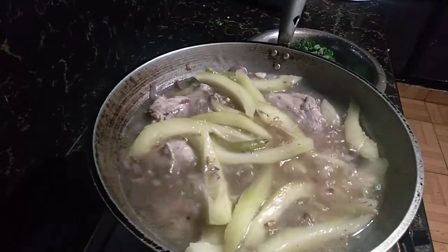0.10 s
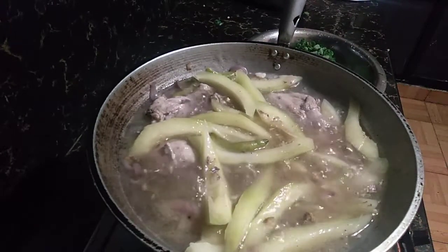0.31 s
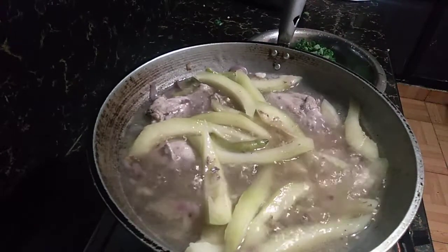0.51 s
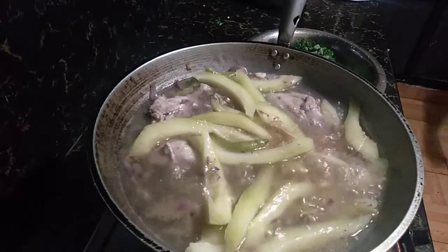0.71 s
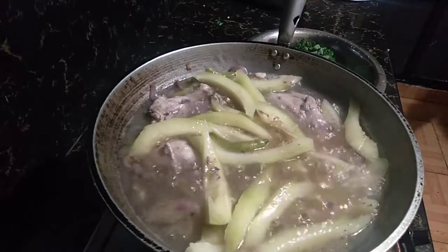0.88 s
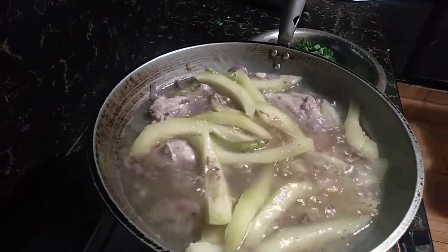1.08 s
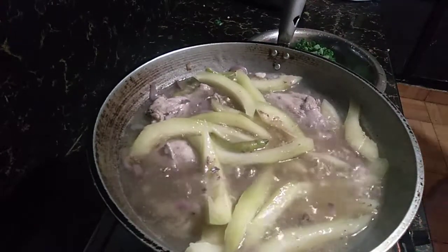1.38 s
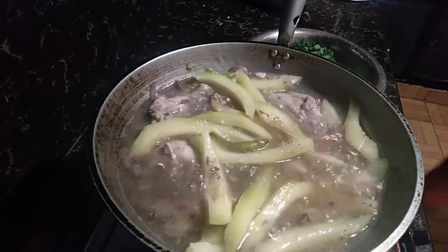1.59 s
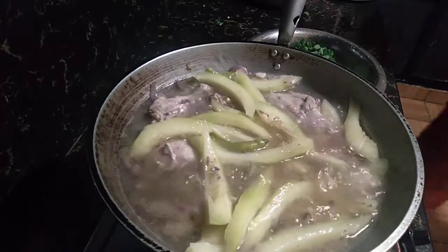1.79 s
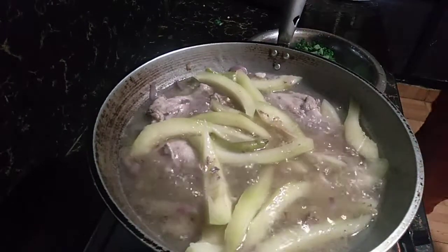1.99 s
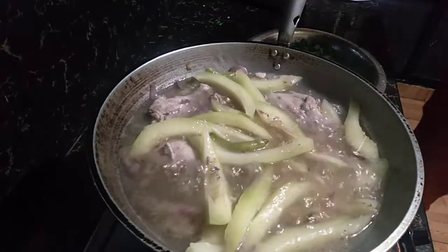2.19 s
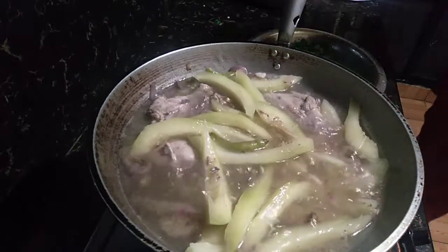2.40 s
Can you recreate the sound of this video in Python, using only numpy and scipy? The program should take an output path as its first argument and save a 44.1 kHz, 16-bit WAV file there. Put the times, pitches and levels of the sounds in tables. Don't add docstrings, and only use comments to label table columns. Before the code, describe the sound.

Broth simmers in a wide metal pan, hiss swelling and fading in uneven waves, with gurgles, bubble pops, fat spits and dry ticks over a very faint flame rumble; close stereo microphone in a small kitchen.

```python
import sys
import numpy as np
from scipy import signal
from scipy.fft import rfft, irfft, next_fast_len
from scipy.io import wavfile
from scipy.ndimage import uniform_filter1d, map_coordinates

SR = 44100
rng = np.random.default_rng(int(sys.argv[2]) if len(sys.argv) > 2 else 0)


def rack_gain(trim_db):
    fader = np.asarray(trim_db, float)
    return 10 ** (fader / 20)


def unload_wav(signal):
    wavfile.write(
        sys.argv[1],
        SR,
        np.round(np.clip(np.atleast_2d(signal).T, -1, 1) * 32767).astype(np.int16),
    )


N = 112455

# start in seconds, peak level in dB, rise in seconds,
# 60 dB decay in seconds, level of the wet body against the hiss in dB.
SLOPS = [(-.05, -44, 0.036, 0.37, -1), (0.083, -52, 0.0052, 5.8, -6.5), (0.199, -36.5, 0.033, 1.26, -14),
         (0.224, -34, 0.042, 0.73, -11.5), (0.298, -42.5, 0.081, 0.93, -5.5), (0.546, -49, 0.069, 7.8, -83),
         (0.696, -38, 0.054, 0.66, -9), (.78, -45, 0.12, 0.78, -5.5), (1.1, -56.5, 0.012, 0.46, -7.5),
         (1.181, -32.5, 0.019, 0.28, -12), (1.213, -38, 0.044, 0.92, -8.5), (1.37, -49, 0.076, 0.69, -16),
         (1.455, -44.5, 0.043, 0.47, -6.5), (1.638, -49.5, 0.0076, 0.14, -42),
         (1.723, -43, 0.044, 1.94, -22.5), (1.799, -52, 0.032, 0.49, -9.5), (1.957, -43, 0.032, 1.5, -10.5),
         (2.057, -36, 0.031, 1.2, -13), (2.17, -48, 0.049, 0.6, -51), (2.39, -51, 0.1, 4.3, -23),
         (2.499, -46.5, 0.02, 0.8, -16)]
# time in seconds, left-right balance in dB.
WALL_PLACE = [
    (0.0, 3.5),
    (2.51, 4.5),
    (2.55, 5),
]
# frequency in Hz, density in dB per Hz.
HISS_COLOUR = [(3100, -55), (3950, -28.5), (4600, -17), (6400, -18), (8600, -3.5), (10500, -10),
               (12600, -22.5), (14300, -27)]
# frequency in Hz, density in dB per Hz.
BODY_COLOUR = [(900, -22), (2000, -9), (2450, -4.5), (2620, -6), (2800, 2.5), (4500, 1.5), (6000, 5.5),
               (9000, -7)]
# frequency in Hz, density in dB per Hz.
FLAME_COLOUR = [(22, -22), (62, 0.5), (82, -10), (120, 4), (250, -1), (325, 4), (420, -5), (1200, -7.5)]
# frequency in Hz, correlation from 0 to 1.
FLAME_ALIKE = [(60, 0.96), (300, 0.85), (700, 0.83), (1400, 0.069)]
# start in seconds, length in seconds, pitch in Hz, level in dB.
GURGLES = [(-.02, 0.064, 1404, -50.5), (0.206, 0.14, 323.6, -49.5), (.211, 0.093, 192, -55),
           (.212, 0.08, 479, -50), (.219, 0.25, 1633, -47.5), (.223, 0.22, 779, -48),
           (.228, 0.26, 1132, -49.5), (0.232, 0.21, 2280, -43.5), (.675, 0.084, 598, -52.5),
           (.678, 0.089, 378, -56.5), (-.02, 0.071, 2400, -48.5), (.7, 0.21, 1347, -55),
           (0.762, 0.1, 950, -64), (.84, 0.11, 2270, -53), (.86, 0.16, 1470, -62), (.74, .08, 1590, -52.5),
           (1.182, 0.055, 184, -58), (1.185, 0.076, 604, -54), (1.188, 0.055, 1020, -54.5),
           (1.212, 0.12, 2490, -56), (1.3, 0.13, 1292, -57), (1.31, 0.12, 2210, -55),
           (1.38, 0.09, 1275, -64.5), (1.947, 0.04, 1125, -55.5), (1.985, 0.11, 858, -59),
           (1.99, 0.13, 2195, -54.5), (2.08, 0.09, 2850, -62), (2.17, 0.09, 2510, -61),
           (2.175, 0.1, 2990, -56), (1.98, 0.091, 2810, -58), (2.3, 0.075, 1280, -64.5)]
# start in seconds, peak level in dB.
SPITS = [(0.0677, -41), (0.0952, -37), (0.1004, -37), (0.1121, -38), (0.1321, -42), (0.1605, -39),
         (0.4938, -33), (0.598, -35), (0.6459, -40), (1.0036, -40), (1.0944, -42), (1.1513, -39),
         (1.3329, -31), (1.4681, -32), (1.5624, -36), (1.6162, -38), (1.6442, -39), (1.7285, -38),
         (1.7454, -37), (1.9116, -36), (2.3321, -36), (2.3825, -37), (2.4054, -33), (2.4443, -38),
         (2.4793, -37), (2.5287, -37)]
# start in seconds, peak level in dB.
TICKS = [(0.5394, -37), (0.7764, -30), (0.7894, -31), (1.1413, -39), (1.2824, -30), (1.3544, -33),
         (1.4344, -35), (1.5504, -31), (1.6064, -38), (1.8084, -33), (1.8224, -33), (1.8474, -35),
         (1.8911, -31)]
# time in seconds, peak level in dB, pitch in Hz, # left-right balance in dB.
POPS = [(0.143, -50.5, 1300, -15), (0.372, -31, 1220, -1), (0.648, -50, 1090, 1.5), (0.698, -28.5, 1547, 0),
        (0.754, -45, 1450, -4), (0.791, -33.5, 1500, 7), (0.91, -41, 1376, -7), (0.928, -39.5, 1054, -6),
        (0.944, -51, 940, -1), (0.994, -49.5, 1080, 2.0), (1.024, -44, 1220, -6), (1.087, -49, 1194, -8),
        (1.187, -41.5, 1110, 4), (1.477, -56, 683, 12), (1.312, -49, 1190, 1), (1.339, -43.5, 1340, 2),
        (1.731, -51.5, 680, 0), (1.817, -51, 610, 4), (1.852, -57.5, 702, -2), (1.869, -55.5, 1388, 20),
        (1.985, -50.5, 888, -11), (2.131, -49.5, 1165, -4), (2.286, -47.5, 1350, -1.0),
        (2.378, -53, 678, 6), (2.399, -51.5, 640, 6), (2.494, -52, 650, 8), (2.52, -49, 674, 4),
        (.141, -60, 657, 11), (.648, -54.5, 1610, -21), (0.754, -58, 1780, 9), (.697, -32.5, 1278, 4),
          (.76, -41, 1140, 1), (.763, -48, 1570, -2), (.794, -54, 487, 7), (.805, -52, 905, 0),
          (.812, -45, 1275, -6), (.838, -62, 867, 0), (.854, -42, 2160, 11), (.879, -38, 2730, 7),
          (.93, -42, 1450, -3), (.946, -46.5, 1330, -8), (1.505, -72, 2370, -3), (1.99, -54, 2110, -1),
          (2.003, -59, 2400, 7), (1.99, -53, 1430, 8), (2.293, -50.5, 1335, -3), (1.732, -54.5, 1046, 16.5),
          (1.736, -46, 1730, -4), (2.13, -50.5, 1560, 12)]
# start in seconds, length in seconds, pitch in Hz,
# level in dB, left-right balance in dB.
HUMS = [
    (0.204, .22, 325.6, -56.5, -1),
    (1.287, 0.22, 117.6, -66, -2),
    (1.29, .2, 61.2, -71, 9),
    (1.438, .16, 329.5, -63, 14.5),
    (2.158, 0.033, 328, -64.5, 12),
    (2.252, 0.044, 328, -63.5, 6),
    (2.394, 0.2, 60.4, -77, 5),
    (0.915, 0.14, 662, -65, 6),
    (1.02, 0.1, 1154, -66.5, -5),
]
# frequency in Hz, 60 dB decay in seconds.
KITCHEN_DECAY = [(200, 0.089), (1500, 0.38), (9000, 0.073)]
# frequency in Hz, depth in dB.
DROPOUTS = [(1200, 0), (2500, 22), (4000, 24), (5500, 12), (9000, 6), (11500, 10), (14000, 14)]


def unit(x):
    return x / np.sqrt(np.mean(x ** 2) + 1e-20)


def along(points, hz):
    f, v = np.transpose(points)
    return np.interp(np.log(hz + 1), np.log(f + 1), v)


def coloured(x, spectrum):
    m = next_fast_len(N + 8192)
    gain = rack_gain(along(spectrum, np.fft.rfftfreq(m, 1 / SR)))
    return unit(irfft(rfft(x, m) * gain, m)[..., :N])


def wobble(rate):
    return map_coordinates(rng.standard_normal(400), [np.arange(N) * rate / SR])


def sides(pan_db):
    return rack_gain(np.multiply.outer([.5, -.5], pan_db))


def place():
    return np.interp(np.arange(N) / SR, *np.transpose(WALL_PLACE))


def mottled(x, deep_db):
    z = signal.stft(x, nperseg=256)[2]
    field = uniform_filter1d(rng.standard_normal(z.shape[1:]), size=8, axis=0)
    field = unit(uniform_filter1d(field, size=6, axis=1))
    return unit(signal.istft(z * rack_gain(deep_db * field), nperseg=256)[1][:, :N])


def fizz():
    drops_per_s, spread_db, crackle_db = 900, 1.5, -8
    drops = (rng.random(N) < drops_per_s / SR) * rack_gain(spread_db * rng.exponential(size=N))
    grain = uniform_filter1d(unit(drops) ** 2, size=24)
    noise = rng.standard_normal((2, N)) * np.sqrt(1 + rack_gain(2 * crackle_db) * grain)
    return mottled(noise, deep_db=1)


def sizzle():
    body_fades = 1.22
    s, db, rise, t60, body_db = np.transpose(SLOPS)[:, :, None]
    t = np.arange(N) / SR - s
    fade_db = 60 * np.maximum(t - rise, 0) / t60
    power = np.clip(t / rise, 0, 1) ** 3 * rack_gain(2 * (db - fade_db))
    body_power = power * rack_gain(2 * (body_db - (body_fades - 1) * fade_db))
    hiss, body = np.sqrt(power.sum(0)), np.sqrt(body_power.sum(0))
    flutter = rack_gain(wobble(26.33) + 0.97 * wobble(90))
    drift = sides(place() + 0.73 * wobble(20.0))
    boil = hiss * coloured(fizz(), HISS_COLOUR) + body * coloured(fizz(), BODY_COLOUR)
    return 2 ** .5 * flutter * drift * boil


def flame():
    m = next_fast_len(N)
    turn = np.arccos(np.clip(along(FLAME_ALIKE, np.fft.rfftfreq(m, 1 / SR)), 0, 1)) / 2
    noise = rfft(rng.standard_normal((2, m)))
    mid, side = irfft(noise * [np.cos(turn), np.sin(turn)], m)[:, :N]
    rumble = coloured(np.array([mid + side, mid - side]), FLAME_COLOUR + [(4000, -64)])
    return rack_gain(-74.5 + 1.1 * wobble(7.33)) * rumble


def bubbles(s, db, hz, pan_db, cycles, rise, glide, apart_s):
    step = np.arange(2048)
    c = hz[:, None] * step / SR
    decay = rack_gain(db[:, None] - 60 * c / (3 * cycles[:, None]))
    shape = decay * (1 - np.exp(-c / rise)) ** 2 * np.cos(step * np.pi / 4096)
    phase = 2 * np.pi * c * (1 + glide * np.minimum(c / cycles[:, None], 2))
    lag = np.pi * hz[:, None] * apart_s * rng.standard_normal((len(s), 1))
    at = (np.round(s * SR).astype(int)[:, None] + step + SR).ravel()
    ports = []
    for sign, gain in zip([1, -1], sides(pan_db)):
        rings = shape * np.sin(phase + sign * lag) * gain[:, None]
        ports.append(np.bincount(at, rings.ravel(), N + 3 * SR)[SR:SR + N])
    return np.array(ports)


def gurgle(count=56):
    ring_cycles, size_db, fade_db, rise, spread = 9, 3.5, 15.5, 0.42, 0.12
    s, length, hz, db = np.transpose(GURGLES)[:, :, None]
    u = (np.arange(count) + rng.random((len(s), count))) / count
    z = rng.standard_normal((len(s), 3, count))
    crowd_db = 10 * np.log10(count * ring_cycles / (hz * length))
    swell_db = 10 * np.log10(np.minimum(u / rise + 0.31, 1))
    level = db + 13 - crowd_db + size_db * z[:, 0] - fade_db * u + swell_db
    pitch = hz * np.exp(spread * rack_gain(.5 * (db + 50.5)) * z[:, 1])
    pan_db = 2.8 + 4 * z[:, 2]
    return bubbles((s + u * length).ravel(), level.ravel(), pitch.ravel(), pan_db.ravel(),
                   np.full(u.size, ring_cycles), rise=0.52, glide=0.026, apart_s=0.00026)


def puffs(table, trim_db, t60, rise):
    t, gate = np.arange(N) / SR, np.zeros(N)
    for s, db in table:
        fade_db = 60 * np.abs(t - s - rise / 2) / t60
        gate += rack_gain(db + trim_db - fade_db) * np.clip((t - s) / rise, 0, 1)
    spray = coloured(mottled(rng.standard_normal((2, N)), deep_db=0.5), HISS_COLOUR)
    steady = spray / np.sqrt(np.abs(uniform_filter1d(spray ** 2, size=64)))
    return sides(place()) * gate * steady


def spits():
    return puffs(SPITS, -6, t60=.035, rise=.003) + puffs(TICKS, -3, t60=.008, rise=.0006)


def pops():
    usual_cycles, rise_cycles, usual_db, shortens = 6.67, 4.44, -48, .4
    s, db, hz, pan_db = np.transpose(POPS)
    cycles = usual_cycles * rack_gain(shortens * (usual_db - db))
    rise = rise_cycles * cycles[:, None] / usual_cycles
    start = s - 2.45 / hz
    return bubbles(start, db + 19, hz, pan_db, cycles, rise, glide=0.0062, apart_s=1e-4)


def hums():
    rise, throb_db, waver = 0.18, 3.5, 0.0193
    t, out = np.arange(N) / SR, np.zeros((2, N))
    for s, length, hz, db, pan_db in HUMS:
        swell = np.interp((t - s) / length, [0, rise, 1], [0, 1, 0]) ** .5
        tone = np.sin(2 * np.pi * hz * np.cumsum(1 + waver * wobble(60)) / SR)
        out += sides(pan_db)[:, None] * rack_gain(db + throb_db * wobble(50.1)) * swell * tone
    return out


def kitchen(x):
    hz, t, z = signal.stft(rng.standard_normal((2, SR // 2)), SR, nperseg=256)
    fade = rack_gain(-60 * t / along(KITCHEN_DECAY, hz)[:, None])
    tail = signal.istft(z * fade, SR, nperseg=256)[1]
    late = np.pad(x.mean(0), (200, 0))[None]
    return signal.fftconvolve(late, tail / np.linalg.norm(tail[0]), axes=1)[:, :N]


def scene():
    wet = gurgle() + pops() + spits()
    return wet + rack_gain(-7) * kitchen(wet) + sizzle() + flame() + hums()


def patchy(x, top):
    quiet_db, starved_per_db = -33.5, 0.8
    muted_low_hz, muted_high_hz, muted_under_db, muted_db = 12650, 13750, -43, -40
    hz, t, z = signal.stft(x, SR, nperseg=1024)
    field = rng.standard_normal(z.shape[1:]) + .5 * rng.standard_normal(z.shape)
    field = uniform_filter1d(field, size=6, axis=1)
    field = unit(uniform_filter1d(field, size=7, axis=2))
    level_db = 10 * np.log10(np.sum(np.abs(z) ** 2, (0, 1)) + 1e-12)
    level_db = uniform_filter1d(level_db, size=5)
    starved = np.clip(2.5 + starved_per_db * (quiet_db - level_db), .2, 2)
    gain = rack_gain(along(DROPOUTS, hz)[:, None] * starved * np.minimum(field - top, 0))
    quiet = level_db + 2 * field < muted_under_db
    band = ((hz > muted_low_hz) & (hz < muted_high_hz))[:, None]
    gain = gain * rack_gain(muted_db * quiet * band)
    return signal.istft(z * gain, nperseg=1024)[1][:, :N]


def low_pass(x):
    return signal.sosfilt(signal.butter(12, 15200, fs=SR, output="sos"), x)


def record(dry):
    m = next_fast_len(N)
    passed = np.fft.rfftfreq(m, 1 / SR) < 14450
    mix = irfft(rfft(patchy(dry, top=-0.015), m) * passed, m)[:, :N]
    return low_pass(mix)


dry = scene()
out = record(dry)
unload_wav(out)
```